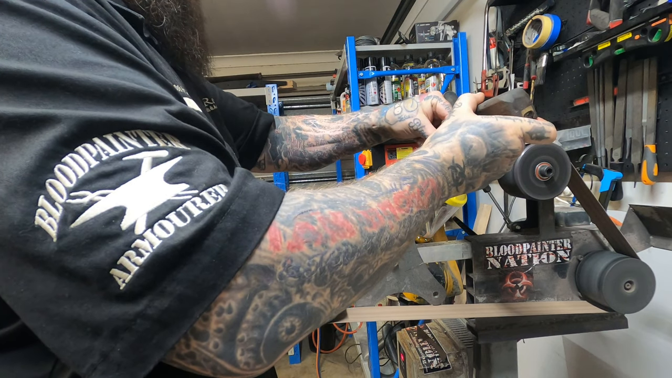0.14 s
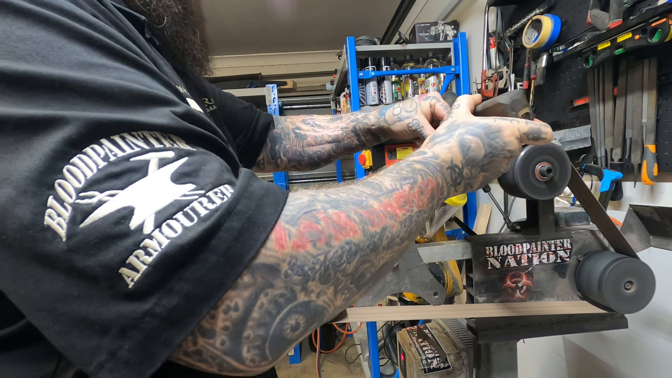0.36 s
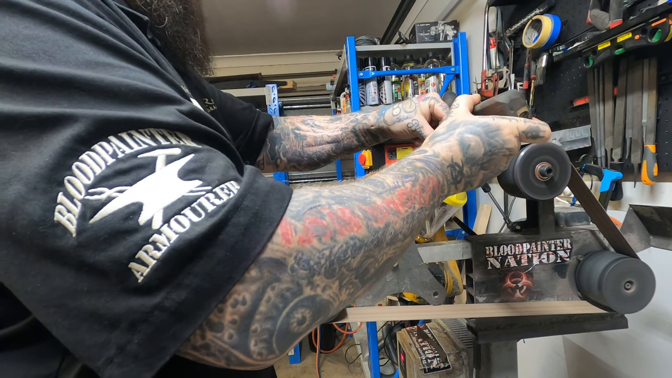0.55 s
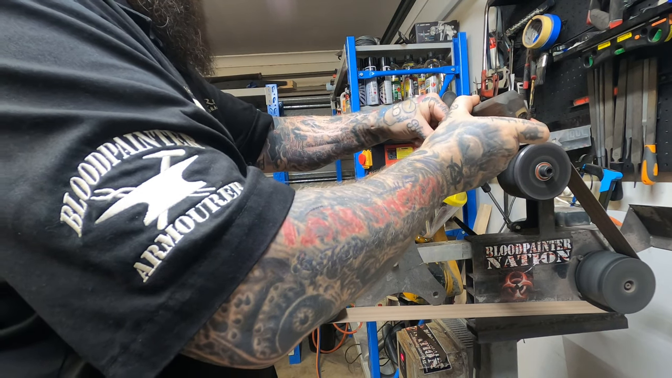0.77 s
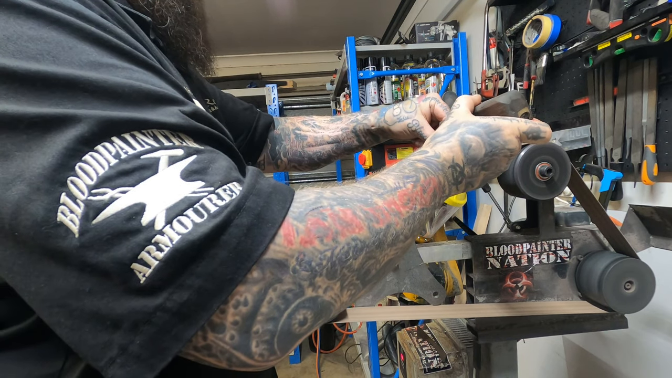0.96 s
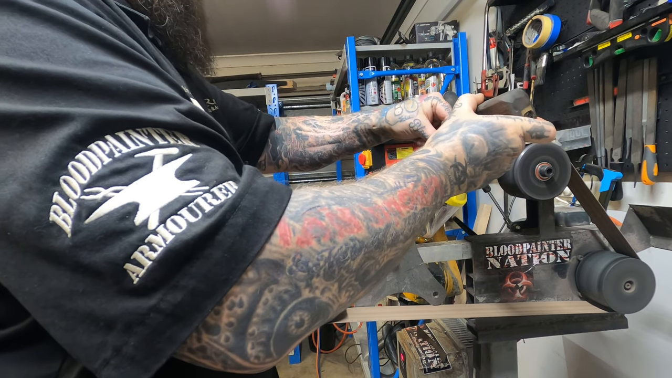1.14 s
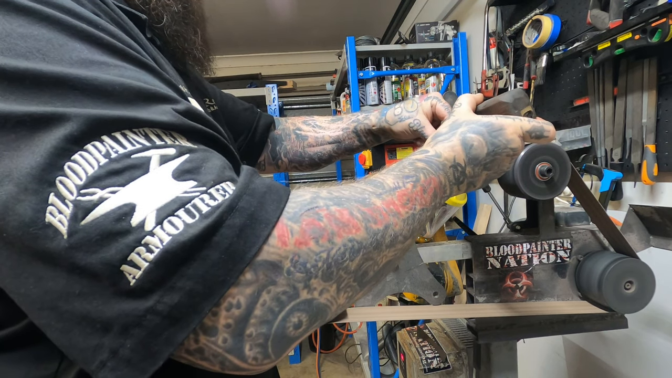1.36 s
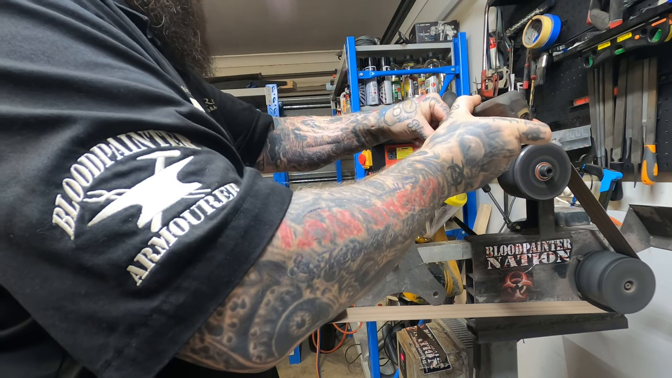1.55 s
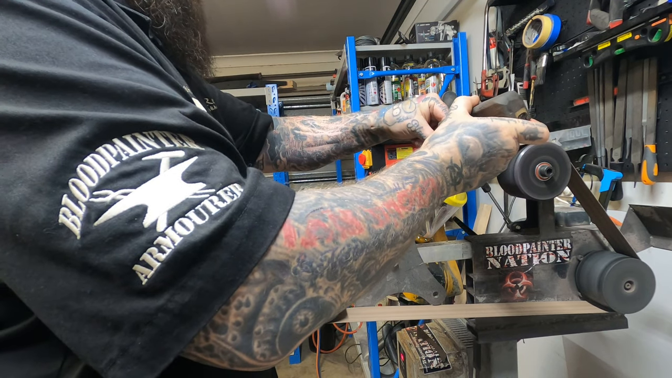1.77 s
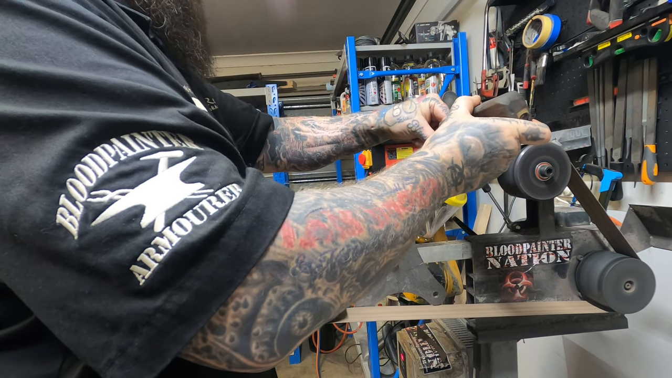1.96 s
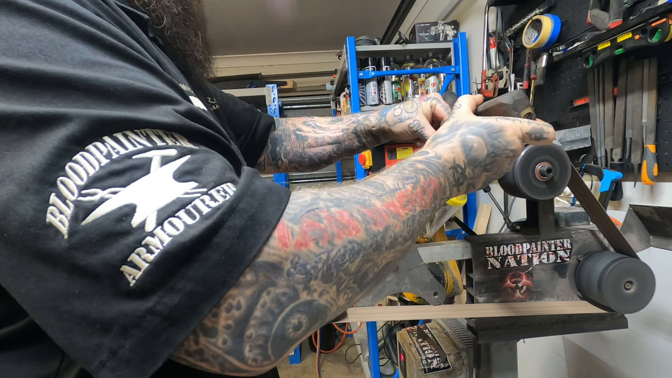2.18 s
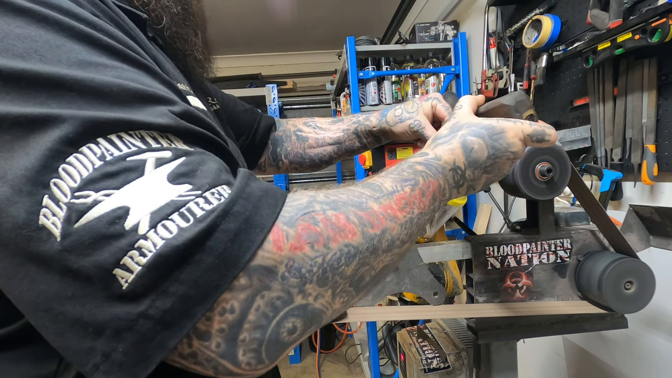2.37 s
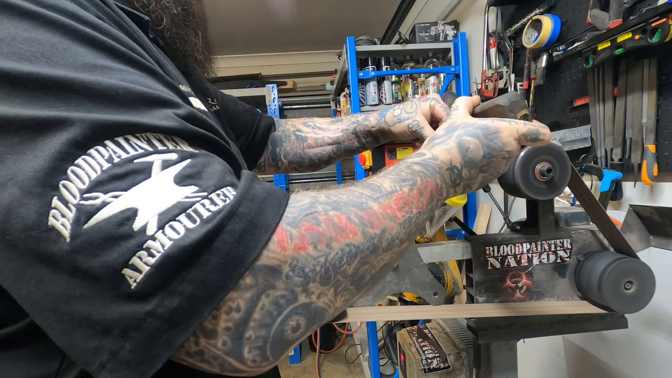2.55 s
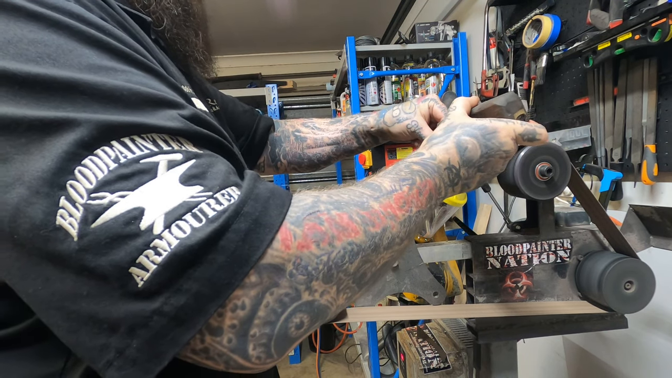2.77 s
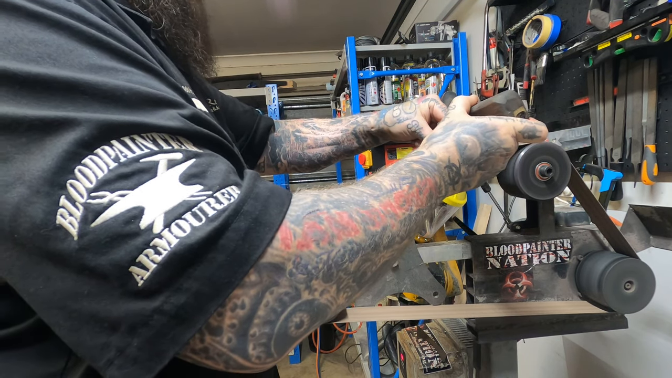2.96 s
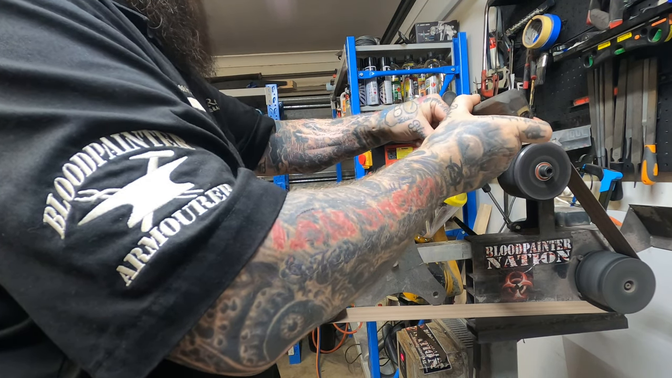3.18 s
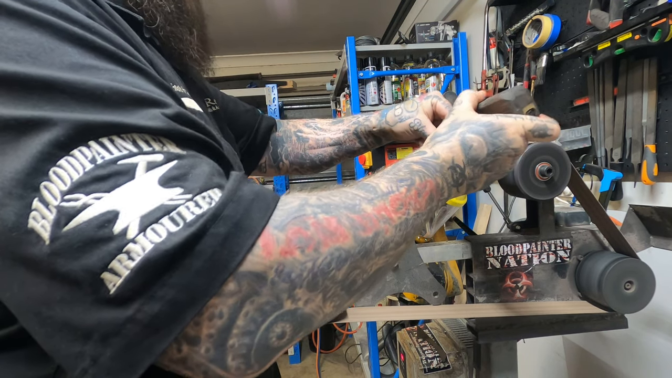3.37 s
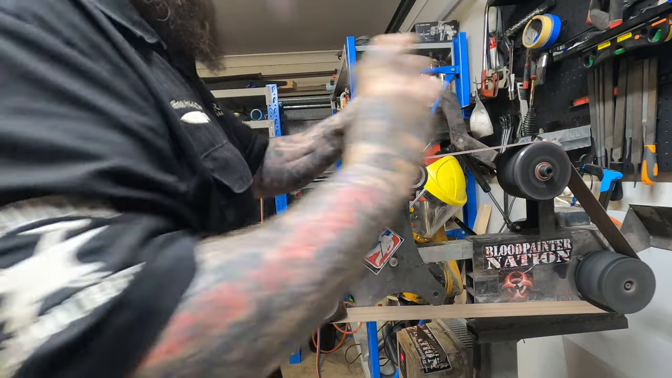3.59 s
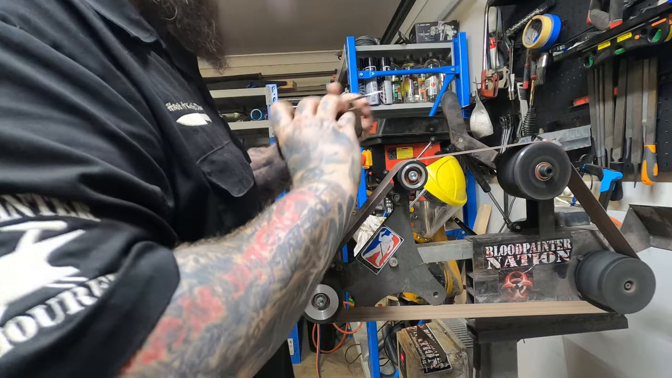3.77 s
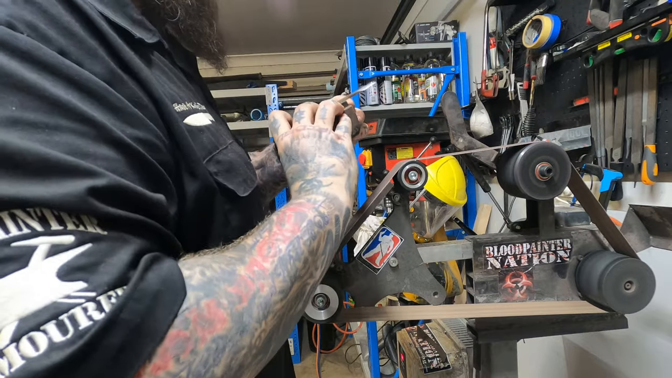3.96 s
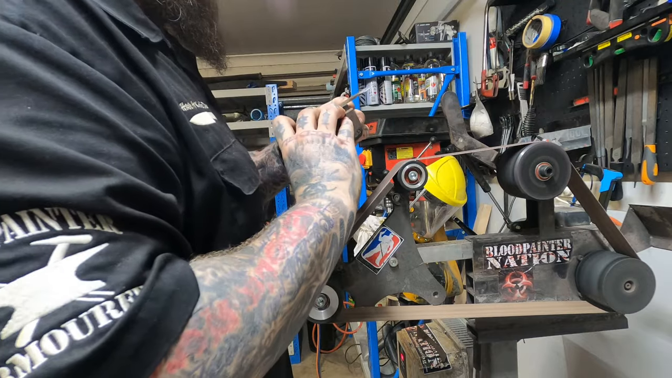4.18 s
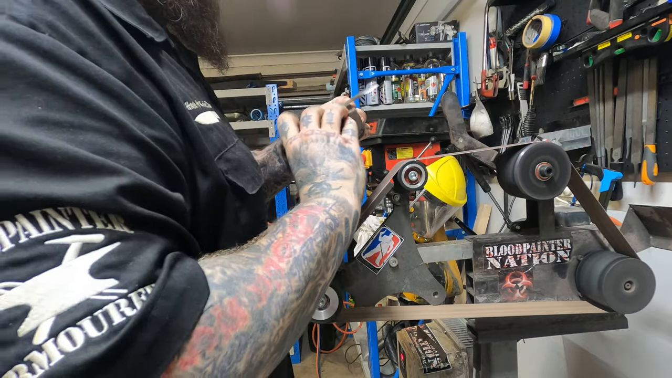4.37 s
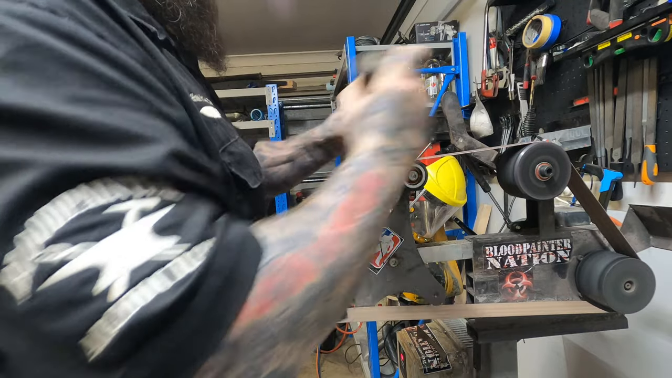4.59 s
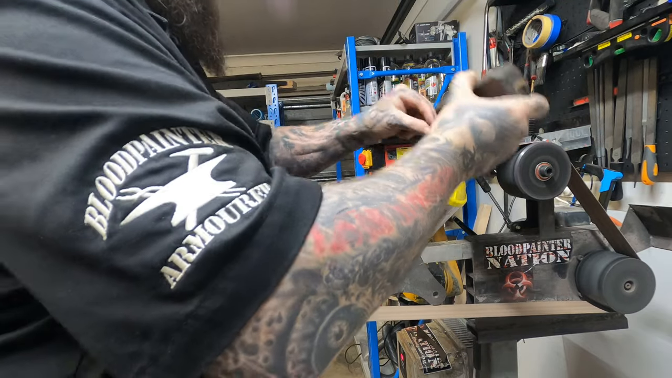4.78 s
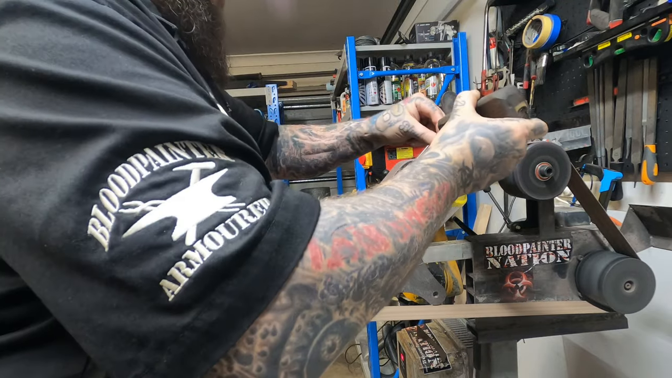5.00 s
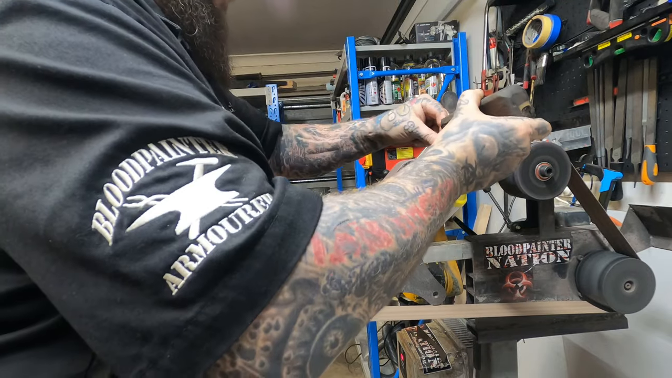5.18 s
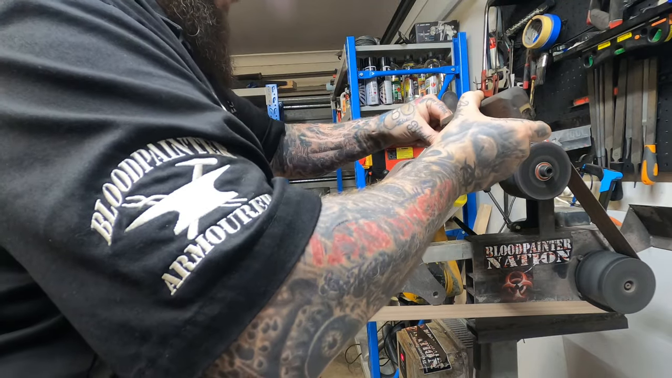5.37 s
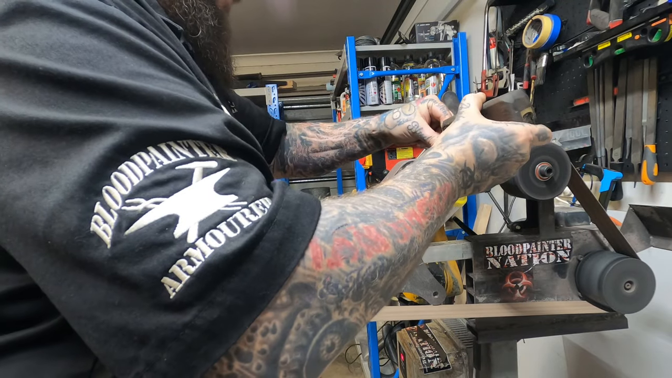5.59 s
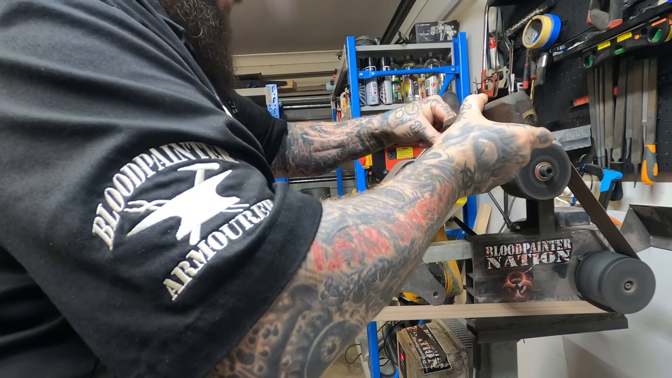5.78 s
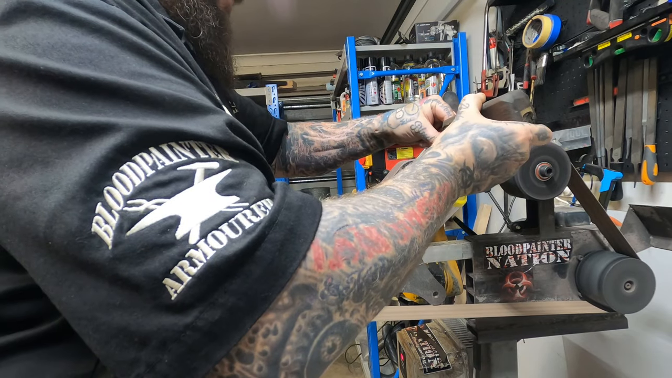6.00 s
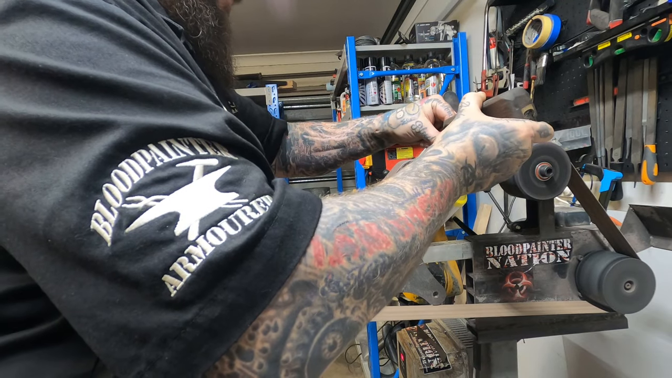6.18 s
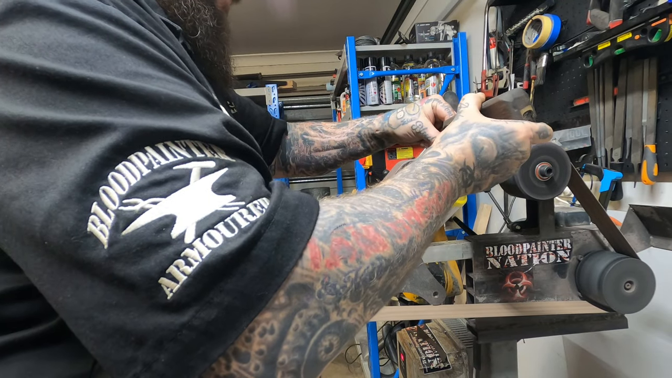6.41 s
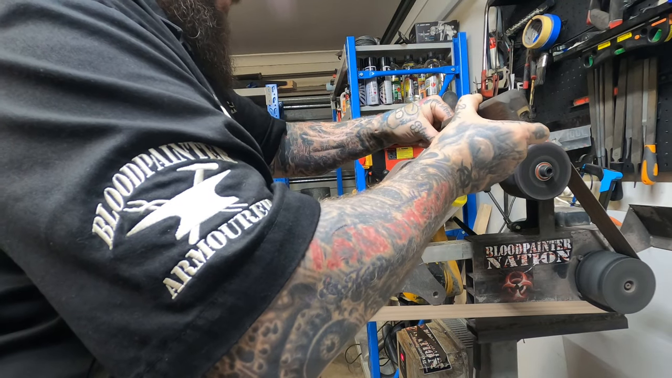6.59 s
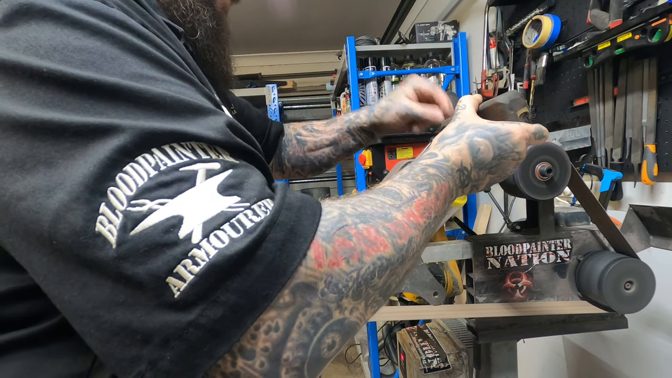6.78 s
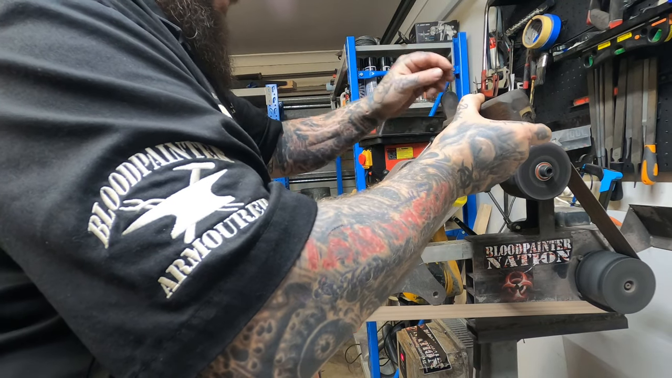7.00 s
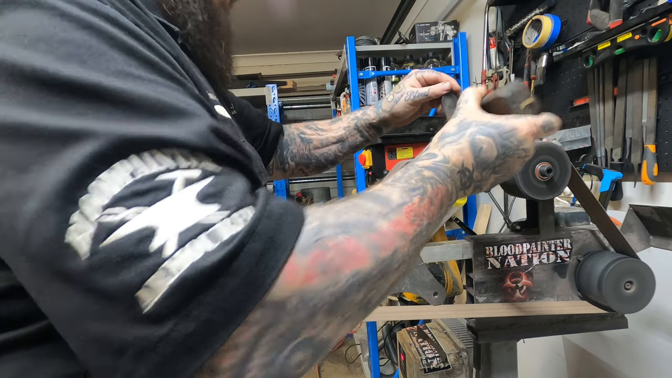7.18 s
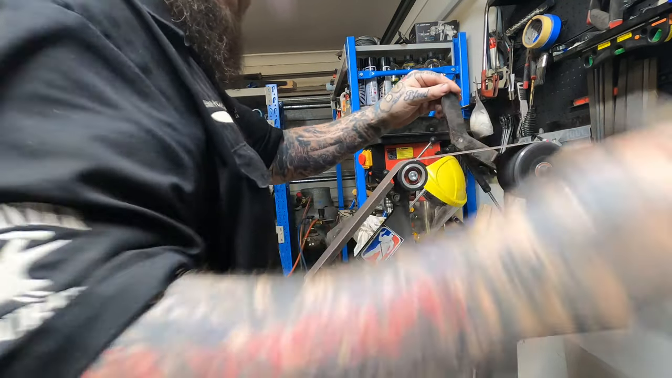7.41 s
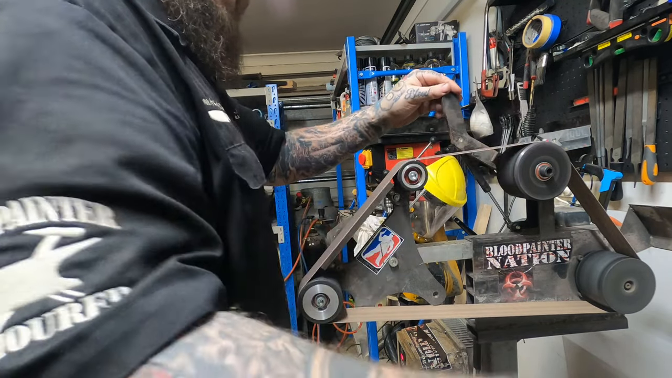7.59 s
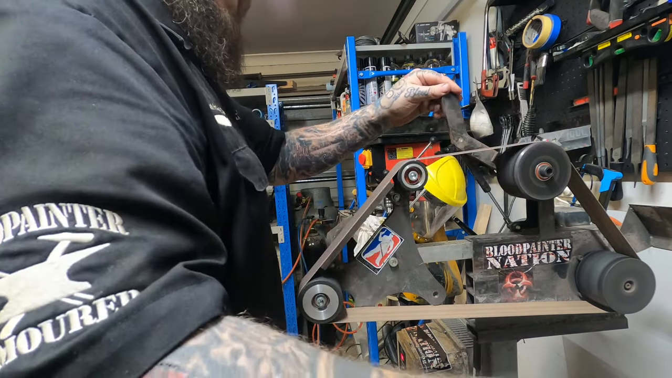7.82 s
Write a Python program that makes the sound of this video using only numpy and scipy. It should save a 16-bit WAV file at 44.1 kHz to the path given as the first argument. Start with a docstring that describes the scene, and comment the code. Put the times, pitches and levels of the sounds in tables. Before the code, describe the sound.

A steady abrasive hiss with bright metallic ringing comes from steel held against a fast belt. The grinding stops and the bare machine whines, rustles and hums with soft bass swells. A thin singing skim leads into a second grinding pass, strongest at first, with a low broken moan. It ends on the free-running belt, heard close up in stereo with no obvious echo.

```python
"""Steel blade on a belt grinder

Close by in a workshop, a blade is pressed on the running belt, lifted, and pressed again elsewhere.
Partly repeating grit noise hisses and rings the blade's broad modes; a second touch skims, then moans.
The wheel whines on multiples of its speed, the belt rustles partly alike on every lap, its span hums.
Rollers, motor hum and bass swells lie behind; wheel, belt and rollers slow a little under the blade.
Two microphone ports hear all of it, alike in the bass and less so in the treble."""
import sys
import numpy as np
from scipy import signal
from scipy.fft import rfft, irfft, next_fast_len
from scipy.io import wavfile
from scipy.ndimage import map_coordinates

SR = 44100
rng = np.random.default_rng(int(sys.argv[2]) if len(sys.argv) > 2 else 0)


def materialize(psi):
    """Save the field psi as 16-bit PCM at rate SR to the path in sys.argv[1].

    A 1-D psi becomes a single channel; in a 2-D psi each row is a channel.
    """
    bounded = np.clip(np.atleast_2d(psi).T, -1, 1)
    quanta = np.round(bounded * 32767).astype(np.int16)
    wavfile.write(sys.argv[1], SR, quanta)


N = 346185
TIME = np.arange(N) / SR  # s
HZ = np.fft.rfftfreq(next_fast_len(N), 1 / SR)
EDGE_HZ = 15600  # upper band limit of the recorder
FREE_TURNS_PER_S, SAG_TURNS_PER_S = 37.962, 0.064  # wheel running free, and its loss at full load
WHEEL_TURNS_PER_LAP = 3.2065
TOUCH_S, BITE_S, LIFT_S = 0.24, 0.16, 0.2  # lengths of the smooth steps of the hand

# Passes of the blade over the belt. Each row: touch, bite and lift in seconds,
# held pressure in dB before the push is added, place from 0 (first spot) to 1 (second spot).
PASSES = [(-0.4, -0.055, 3.45, -0.87, 0.091), (5.143, 5.498, 7.25, -4.5, 1)]
# Extra push of the hand; the end values hold outside the table. Each row: time in seconds, push in dB.
PUSH = [(5.45, 0.5), (5.66, 7.5), (5.93, 6.5), (6.05, 4.5), (6.25, 3.5), (6.55, -3), (6.78, 1.5), (7.0, -1),
        (7.2, -1)]
# Grit that comes back alike on every lap. Each row: frequency in Hz, share of the power from 0 to 1.
GRIT_REPEAT = [(1000, 0.75), (4000, 0.75), (7000, 0.86), (12000, 0.36)]


def from_db(db):
    """Decibels to gain."""
    return 10 ** (np.asarray(db) / 20)


def curve(rows, axis=1):
    """One column of a table over time, at every sample."""
    columns = np.transpose(rows)
    return np.interp(TIME, columns[0], columns[axis])


def spectrum(rows, axis=1):
    """One column of a table over log frequency, at every bin."""
    columns = np.transpose(rows)
    return np.interp(np.log(HZ + 1), np.log(columns[0]), columns[axis])


def colour(x, gain):
    """Filters x by a gain for every bin."""
    size = next_fast_len(N)
    return irfft(rfft(x, size) * gain, size)[..., :N]


def chance(*shape):
    """Complex normal numbers of power 1."""
    return (rng.standard_normal(shape) + 1j * rng.standard_normal(shape)) / np.sqrt(2)


def drift(rate_hz, above_hz=0.1):
    """A random curve of rms 1 that moves at rates between above_hz and rate_hz."""
    slow = colour(rng.standard_normal(N), np.exp(-(HZ / rate_hz) ** 2) * (HZ > above_hz))
    return slow / slow.std()


def step(at_s, length_s):
    """A smooth rise from 0 to 1 around a moment."""
    return (1 + np.tanh(2 * (TIME - at_s) / length_s)) / 2


def wavering(angle, waver, per_s):
    """A tone of rms 1 whose height and phase flutter, as two parts a quarter cycle apart."""
    flutter = chance(256)
    swing = 1 + waver * np.interp(TIME * per_s, np.arange(len(flutter)), flutter)
    swing = swing / np.hypot(1, waver)
    tone = np.sqrt(2) * swing * np.exp(1j * (angle + 2 * np.pi * rng.random()))
    return np.array([tone.real, rng.choice([-1, 1]) * tone.imag])


def revolving(rate, heights, memory_turns):
    """Two unrelated noises that repeat each turn and slowly forget their shape; unit heights: 0 dB per Hz."""
    turns = np.cumsum(rate) / SR
    count = int(turns[-1]) + 2
    size = 2 ** int(np.log2(len(heights)) + 4)  # points round one turn
    keep = np.exp(-1 / memory_turns)
    start = keep * chance(2, 1, len(heights))
    fresh = chance(2, count, len(heights))
    # every order of the turn changes a little from one turn to the next
    orders = signal.lfilter([np.sqrt(1 - keep ** 2)], [1, -keep], fresh, axis=1, zi=start)[0]
    shapes = irfft(orders * heights, size) * size * np.sqrt(rate.mean() / 2)
    where = [turns, turns % 1 * size]
    return np.array([map_coordinates(s, where, order=1, mode="grid-wrap") for s in shapes])


def rubbing(lap_rate, repeat, memory_turns):
    """The same grains pass on every lap; the rest of the noise is new each time."""
    share = spectrum(repeat)
    laps = revolving(lap_rate, np.ones(int(EDGE_HZ / lap_rate.mean())), memory_turns)
    fresh = rng.standard_normal((2, N)) * np.sqrt(SR / 2)  # 0 dB per Hz
    return colour(laps, np.sqrt(share)) + colour(fresh, np.sqrt(1 - share))


def resonate(x, hz, width_hz):
    """A resonance of gain 1 whose centre follows the curve hz."""
    turn = np.exp(2j * np.pi * np.cumsum(hz) / SR)
    r = np.exp(-np.pi * width_hz / SR)
    # shift the centre down to 0 Hz, smooth, and shift back
    return 2 * (turn * signal.lfilter([(1 - r) ** 2], [1, -2 * r, r * r], x / turn)).real


def wandering(x, gain, detune=0.0032, wander_hz=2.0):
    """Filters x by resonances that slide a little as the grip and the point of contact shift."""
    shift = np.clip(drift(wander_hz) / 2, -1, 1)
    out = 0
    for k in (-1, 0, 1):
        # 1j: at resonance the blade moves a quarter cycle out of step with the scraping
        tuned = colour(x, 1j * np.interp(HZ / (1 + detune * k), HZ, gain))
        out = out + np.maximum(1 - abs(shift - k), 0) * tuned
    return out


def handling(laid_on_db=-13.0):
    """Contact, pressure and place of the blade: laid on, pushed in, held under a varying push, lifted."""
    contact = held = 0
    for touch_s, bite_s, lift_s, held_db, _ in PASSES:
        laid_on = step(touch_s, TOUCH_S) * (1 - step(lift_s, LIFT_S))
        bite = step(bite_s, BITE_S)
        contact = contact + laid_on
        held = held + laid_on * ((1 - bite) * from_db(laid_on_db) + bite * from_db(held_db))
    place = curve([(s, spot) for touch_s, _, lift_s, _, spot in PASSES for s in (touch_s, lift_s)])
    return contact, held * from_db(curve(PUSH)), place


def grinding(lap_rate, contact, pressure, place, wear_db=-0.08, tremble_db=0.64,
             first_ring_db=-0.5, second_ring_db=-0.1, chatter_db=-0.1, chatter_hz=131, ring_loss=0.24):
    """Grit scrapes the steel and rings the blade; belt wear and the hand vary the bite."""
    # Grit cutting steel, at pressure 1. Each row: frequency in Hz, level in dB per Hz.
    grit = [(300, -109), (1000, -78), (1900, -68), (2500, -62.5), (3300, -63), (4000, -61.5), (4500, -59),
            (5500, -60), (7000, -62), (9300, -73), (12400, -75), (15300, -88.5)]
    # Modes of the hand-held blade, before the ring trims. Each row: frequency in Hz,
    # distance in Hz to half the amplitude, dB per Hz at the first spot, dB per Hz at the second.
    blade = [(1280, 25, -85, -71), (1650, 73, -61.5, -60.5), (1833, 34, -74, -57), (2175, 20, -54, -61),
             (2226, 53, -55, -58.5), (2320, 17, -58, -65), (2450, 94, -60, -59), (2585, 56, -54.5, -59),
             (2860, 21, -72, -58), (3218, 39, -49.5, -48.5), (3320, 44, -51, -53), (3405, 66, -51.5, -53.5),
             (3537, 38, -51, -54), (3674, 54, -51.5, -50), (3792, 22, -45.5, -55), (3920, 40, -47, -52),
             (4003, 27, -47.5, -55), (4250, 42, -52, -59), (5010, 86, -63, -60), (5880, 250, -64, -63),
             (7840, 60, -80, -70), (8580, 110, -65.5, -69), (9800, 150, -73, -87), (10500, 90, -70, -92),
             (11300, 60, -73, -92), (12100, 1200, -92, -80.5)]
    wear = np.sin(2 * np.pi * np.cumsum(lap_rate) / SR)
    bite = from_db(wear_db * wear + tremble_db * drift(24, above_hz=1.7))
    scrape = rubbing(lap_rate, GRIT_REPEAT, memory_turns=30.4) * bite
    hiss = colour(scrape, from_db(spectrum(grit)))

    first = second = 0  # power of the modes
    for hz, width, first_db, second_db in blade:
        peak = 1 / (1 + ((HZ - hz) / width) ** 2) ** 2
        first = first + peak * from_db(first_db) ** 2
        second = second + peak * from_db(second_db) ** 2
    ring = (1 - place) * wandering(scrape, np.sqrt(first)) + place * wandering(scrape, np.sqrt(second))
    # the blade judders on the grit; ring_loss is dB of ring lost for each dB of extra push
    ring = ring * from_db(chatter_db * drift(chatter_hz, above_hz=12.0) - ring_loss * curve(PUSH))
    ring_trim = from_db((0.5 - place) * first_ring_db + place * second_ring_db)
    return pressure * hiss + contact * ring_trim * ring


def skim(lap_rate, skim_db=-51.0, skim_hz=3200.0, width_hz=110.0):
    """Laid lightly on the belt again, the blade sings in one mode until the grit bites."""
    touch_s, bite_s = PASSES[-1][:2]
    scrape = rubbing(lap_rate, GRIT_REPEAT, memory_turns=20)
    ring = colour(scrape, from_db(skim_db) / (1 + ((HZ - skim_hz) / width_hz) ** 2))
    return ring * step(touch_s, TOUCH_S) * (1 - step(bite_s, BITE_S))


def moan(moan_hz=795.0, waver=1.2, flutter_per_s=20.0):
    """During the second pass the blade moans low and brokenly, a strongly fluttering tone."""
    # Swells of the moan. Each row: time in seconds, level in dB.
    moan_level = [(5.3, -85), (5.6, -46), (5.85, -59), (6.1, -49), (6.5, -54), (6.95, -44), (7.1, -58),
                  (7.3, -85)]
    return from_db(curve(moan_level)) * wavering(2 * np.pi * moan_hz * TIME, waver, flutter_per_s)


def wheel_whine(speed, load, place, treble_db=1.0, treble_hz=4300.0,
                free_waver=0.39, loaded_waver=0.03, flutter_per_s=15.0, stray_hz=1.1, strays_per_s=5):
    """Strong wheel tones flutter and stray in pitch; their balance differs as the worker moves."""
    # The strongest tones of the wheel, before the treble lift. Each row: multiple of the wheel's speed,
    # dB running free, dB heard in the first pass, dB heard in the second.
    wheel_tones = [(30, -49, -52, -51), (33, -54, -63, -49), (34, -46, -51, -50), (39, -47, -54, -47),
                   (40, -47, -50, -47), (42, -48, -48, -43), (45, -47, -50, -55), (51, -42, -46, -44),
                   (52, -50, -48, -48), (57, -39, -36, -48), (60, -48, -49, -46), (63, -42, -48, -54),
                   (64, -38, -44, -41), (66, -46, -44, -42), (70, -32.5, -34.5, -35), (72, -36.5, -38, -36),
                   (76, -41, -46, -52), (78, -35, -39, -36), (80, -38, -41, -42), (81, -33.5, -38, -30.5),
                   (84, -37, -42, -40), (85, -52, -37, -42), (86, -37, -46, -39), (87, -39, -46, -41),
                   (88, -40, -43, -41), (90, -35.5, -45, -35), (93, -40, -42, -48), (96, -35, -38, -37),
                   (99, -32, -31.5, -31), (100, -31, -33, -32), (102, -35.5, -46, -44),
                   (105, -45, -44, -42), (118, -43, -46, -47), (120, -44, -51, -49), (126, -50, -51, -53),
                   (129, -42, -47, -47), (132, -38, -42, -42), (135, -41, -47, -44), (138, -42, -50, -51),
                   (144, -44, -51, -52), (147, -39, -44, -45), (150, -42, -52, -44), (153, -42, -45, -42),
                   (156, -45, -53, -51), (159, -42, -49, -47), (174, -48, -47, -46), (177, -44, -54, -50),
                   (178, -44, -44, -48), (182, -41, -50, -54), (184, -44, -52, -52), (188, -46, -51, -55),
                   (192, -44, -52, -56), (222, -49, -58, -56), (234, -56, -56, -56), (252, -52, -60, -64),
                   (279, -58, -66, -67)]
    angle = 2 * np.pi * np.cumsum(speed) / SR
    waver = free_waver + loaded_waver * load
    out = np.zeros((2, N))
    for order, free_db, first_db, second_db in wheel_tones:
        in_pass = from_db(first_db) * (1 - place) + from_db(second_db) * place
        height = from_db(free_db) * (1 - load) + in_pass * load
        height = height * from_db(treble_db * (order * FREE_TURNS_PER_S > treble_hz))
        stray = stray_hz * np.interp(TIME * strays_per_s, np.arange(64), rng.standard_normal(64))
        tone_angle = order * angle + 2 * np.pi * np.cumsum(stray) / SR
        out += height * wavering(tone_angle, waver, flutter_per_s)
    return out


def wheel_whirr(speed, level_db=-2.0, threefold_db=2, uneven_db=2.5):
    """A dense comb of weaker wheel tones; three bumps a turn favour every third one."""
    # Colour of the comb, before level_db. Each row: frequency in Hz, level in dB per Hz.
    whirr = [(100, -82), (600, -80), (1200, -76.5), (2300, -65.5), (3300, -62), (4300, -60.5), (5500, -67),
             (7000, -79), (8500, -74), (11000, -93), (15000, -100)]
    order = np.arange(int(EDGE_HZ / speed.mean()))
    uneven = uneven_db * rng.uniform(-1, 1, len(order))
    heights = from_db(uneven + threefold_db * (order % 3 == 0))
    comb = revolving(speed, heights / np.sqrt(np.mean(heights ** 2)), memory_turns=11.5)
    return colour(comb, from_db(spectrum(whirr))) * from_db(level_db)


def belt(lap_rate, pressure, free_db=2.5, pressed_db=-3.5, bass_pressed_db=-1.5, bass_hz=406.0):
    """Rustle and rumble of the belt over its wheels; the blade damps the rustle more than the bass."""
    # The running belt, before the trims below. Each row: frequency in Hz, level in dB per Hz.
    belt_colour = [(20, -86), (48, -83), (72, -68), (115, -73), (170, -66.5), (270, -67), (400, -70),
                   (540, -76), (850, -71.5), (1000, -68), (1380, -69), (1620, -62.5), (1880, -69),
                   (2050, -66), (2500, -64.5), (2850, -60.5), (3300, -59), (3800, -58.5), (4400, -63.5),
                   (5400, -64), (6200, -65.5), (7000, -64.5), (8000, -70.5), (9000, -76), (12300, -81.5),
                   (15300, -97)]
    # Noise alike on every lap. Each row: frequency in Hz, share of the power from 0 to 1.
    belt_repeat = [(60, 0.3), (200, 0.74), (1000, 0.49), (2500, 0.36), (5000, 0.02), (12000, 0)]
    # The worker's body shades the rustle as it moves. Each row: time in seconds, change in dB.
    shade = [(0, -3), (1.9, -2), (2.5, -1), (3.3, -0.8), (3.55, -0.8), (4.0, 0), (5.5, 0.3), (6.3, 0),
             (7.85, -0.6)]
    sound = colour(rubbing(lap_rate, belt_repeat, memory_turns=41), from_db(spectrum(belt_colour)))
    bass = colour(sound, 1 / (1 + (HZ / bass_hz) ** 4))
    rustle = (sound - bass) * from_db(free_db + pressed_db * pressure + curve(shade))
    return bass * from_db(bass_pressed_db * pressure) + rustle


def belt_span(lap_rate, hum_width_hz=35.5, joint_share=0.74, growl_width_hz=213.0):
    """The joint plucks the free span once a lap; a tighter span hums higher, and the first pass growls."""
    # Hum of the free span. Each row: time in seconds, pitch in Hz, level in dB per Hz.
    span_hum = [(0, 433, -63), (1.9, 432, -63.5), (2.9, 459, -69), (3.3, 434, -74), (3.5, 345, -67),
                (5.1, 347, -69), (5.4, 369, -58.5), (6.3, 373, -60), (7.15, 377, -60.5), (7.3, 346, -67)]
    # Broad growl gliding as the blade shifts. Each row: time in seconds, centre in Hz, level in dB per Hz.
    growl = [(0, 1110, -62.5), (0.5, 1040, -67), (1.0, 1000, -66), (1.7, 1025, -67), (2.3, 1080, -65),
             (2.9, 1069, -65.5), (3.35, 1080, -65), (3.6, 1100, -100)]
    # Growl alike on every lap. Each row: frequency in Hz, share of the power from 0 to 1.
    growl_repeat = [(300, 0.45), (1100, 0.74)]
    laps = np.floor(np.cumsum(lap_rate) / SR + rng.random())
    joint = np.diff(laps, prepend=0) * SR / np.sqrt(2 * lap_rate)  # one click a lap
    rustle = np.sqrt(SR / 2) * rng.standard_normal((2, N))
    flap = np.sqrt(joint_share) * joint * np.array([[1], [0]]) + np.sqrt(1 - joint_share) * rustle
    hum = from_db(curve(span_hum, axis=2)) * resonate(flap, curve(span_hum), hum_width_hz)
    shake = rubbing(lap_rate, growl_repeat, memory_turns=22)
    return hum + from_db(curve(growl, axis=2)) * resonate(shake, curve(growl), growl_width_hz)


def drone(speed, level_db=-1.5, roller_hz=909.8):
    """Rollers and frame sound low tones that follow the drive; one roller sings on and off."""
    # Low tones of rollers and frame, before level_db. Each row: frequency in Hz, level in dB.
    low_tones = [(87, -54.5), (116, -61), (142, -54.5), (166.9, -50.5), (177.6, -62.5), (201, -50),
                 (228, -55), (290.7, -54.5), (699.8, -55)]
    # The singing roller. Each row: time in seconds, level in dB.
    roller = [(0, -63.5), (0.55, -62), (0.75, -58), (1.6, -48), (1.8, -62), (3.3, -64), (3.6, -46),
              (4.4, -50), (4.7, -70), (5.5, -44), (5.9, -49), (6.4, -64), (7.3, -57), (7.85, -49)]
    angle = 2 * np.pi * np.cumsum(speed / speed.mean()) / SR
    low = sum(from_db(db + level_db) * wavering(hz * angle, waver=0.68, per_s=9.0) for hz, db in low_tones)
    return low + from_db(curve(roller)) * wavering(roller_hz * angle, waver=0.8, per_s=20.0)


def motor(hum_hz=59.2, rumble_db=-64.5, rumble_hz=70.0):
    """The wavering hum of the motor sinks away over a low rumble of filtered noise."""
    # Motor hum. Each row: time in seconds, level in dB.
    hum_level = [(0.0, -47.5), (1.3, -48), (2.5, -51.5), (3.6, -57), (7.85, -64)]
    rumble = colour(rng.standard_normal((2, N)), HZ / (1 + (HZ / rumble_hz) ** 6))
    hum = wavering(2 * np.pi * hum_hz * TIME, waver=0.3, per_s=12.0)
    return from_db(curve(hum_level)) * hum + from_db(rumble_db) * rumble / rumble.std()


def swells(swell_hz=61.2, swell_s=0.058):
    """The bass booms softly now and then, a wavering tone under short bell-shaped swells."""
    # Dull swells in the bass. Each row: peak in seconds, level in dB.
    booms = [(3.85, -43.5), (4.45, -44), (4.98, -47), (5.47, -48), (6.02, -50), (6.45, -48), (7.0, -51),
             (7.45, -48)]
    height = sum(from_db(db) * np.exp(-((TIME - s) / swell_s) ** 2) for s, db in booms)
    return height * wavering(2 * np.pi * swell_hz * TIME, waver=0.22, per_s=16.0)


def arm_shadow(sound, at_s=7.5, length_s=0.11, dip_db=-2, above_hz=8000):
    """An arm sweeping past the microphone briefly dulls the treble; the bass bends around it."""
    bass = colour(sound, 1 / (1 + (HZ / above_hz) ** 4))
    return bass + (sound - bass) * from_db(dip_db * np.exp(-((TIME - at_s) / length_s) ** 2))


def ports(pair):
    """Blends two unrelated sounds into what the left and right microphone ports hear."""
    # The two ports. Each row: frequency in Hz, likeness from 0 to 1, lead of the left in radians,
    # left minus right in dB.
    port_rows = [(50, 0.92, 0, -0.5), (300, 0.93, 0.22, 0), (1000, 0.81, 0.28, -0.5),
                 (2050, 0.67, -0.2, 1.5), (3686, 1, -1.6, 5), (4490, 0.6, -3, 1), (5300, 0.5, -1.5, -3),
                 (5570, 0.41, -2, -0.5), (6980, 0.6, -4.5, -1), (7410, 0.1, -0.5, -3),
                 (7480, 0.44, -4.5, -7), (8800, 0.13, -1.5, -14.5), (11000, 0.33, -2.5, -12),
                 (14200, .12, -1, -7.5), (15500, 0.2, -13, -9)]
    same = spectrum(port_rows)
    lead, tilt = spectrum(port_rows, axis=2), from_db(spectrum(port_rows, axis=3))
    sides = np.array([tilt * np.exp(1j * lead), np.ones(len(HZ))]) * np.sqrt(2 / (1 + tilt ** 2))
    shared = np.sqrt((1 + same) / 2)
    apart = np.sqrt((1 - same) / 2) * np.array([[1], [-1]])
    return colour(pair[0], sides * shared) + colour(pair[1], sides * apart)


def scene(full_load_db=-0.88, damped_db=-1.0):
    """Blade, wheel, belt and rollers tied to one drive that slows under load, with motor and swells."""
    contact, pressure, place = handling()
    load = np.clip(pressure / from_db(full_load_db), 0, 1)
    speed = FREE_TURNS_PER_S - SAG_TURNS_PER_S * np.sqrt(load)  # wheel turns per second
    lap_rate = speed / WHEEL_TURNS_PER_LAP  # belt laps per second
    blade_sound = grinding(lap_rate, contact, pressure, place) + skim(lap_rate) + moan()
    wheel = wheel_whine(speed, load, place) + wheel_whirr(speed)
    # the blade steadies the belt, which calms the rollers
    rollers = drone(speed) * from_db(damped_db * load)
    machine = wheel + belt(lap_rate, pressure) + belt_span(lap_rate) + rollers + motor() + swells()
    return ports(arm_shadow(blade_sound + machine))


def record(dry):
    """The recorder's band limit, a steep low-pass."""
    low_pass = signal.firwin(511, EDGE_HZ, window=("kaiser", 9), fs=SR)
    return signal.oaconvolve(dry, low_pass[None], "same")


dry = scene()
out = record(dry)
materialize(out)
```